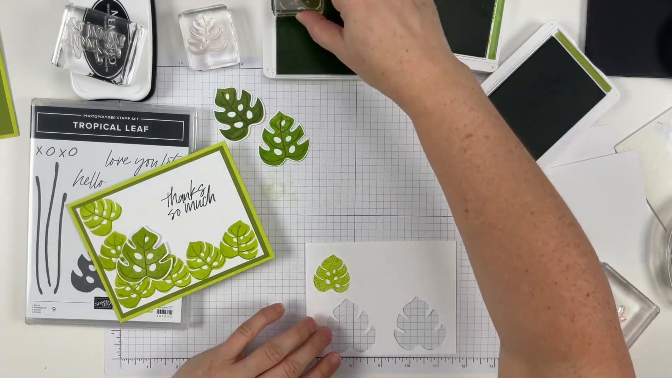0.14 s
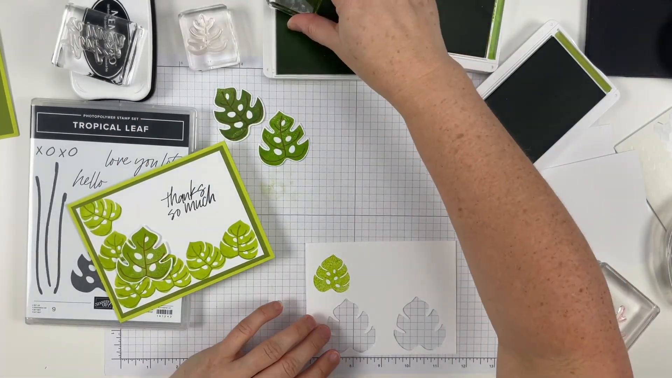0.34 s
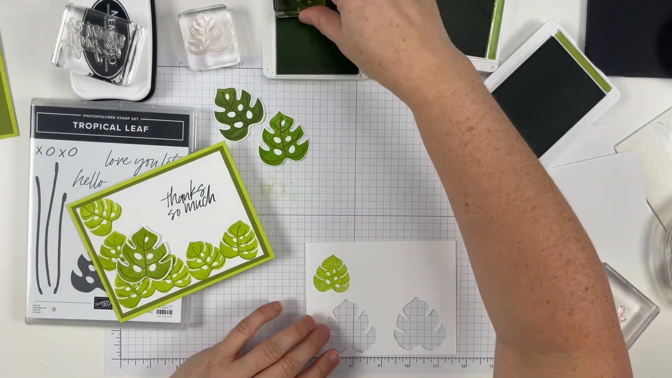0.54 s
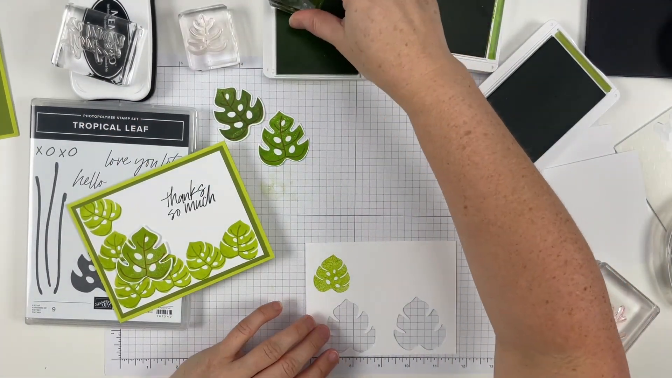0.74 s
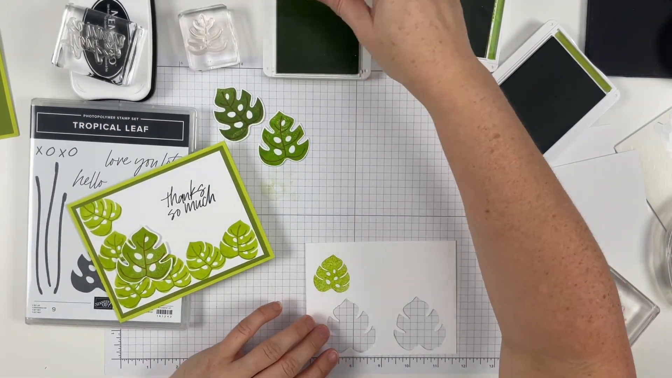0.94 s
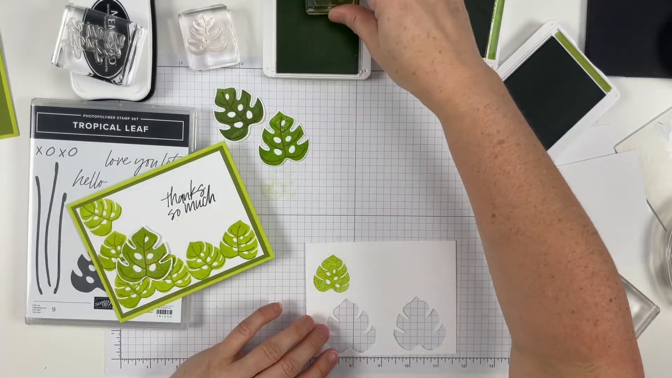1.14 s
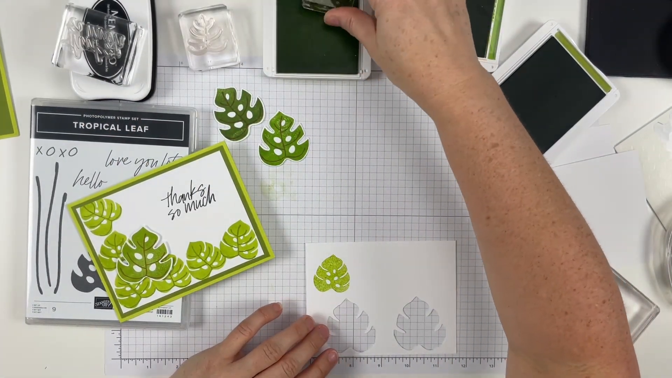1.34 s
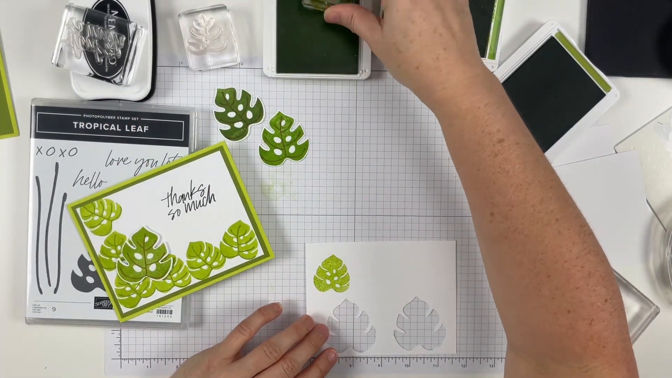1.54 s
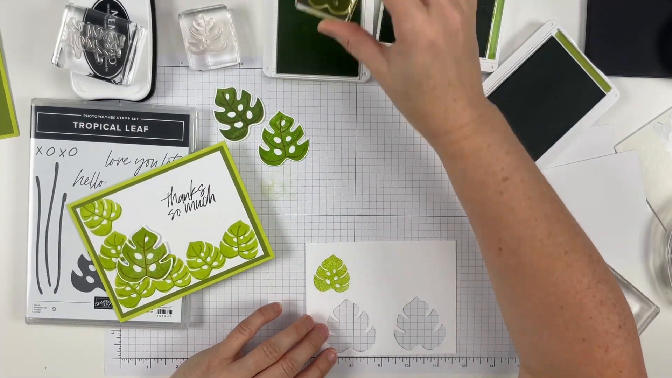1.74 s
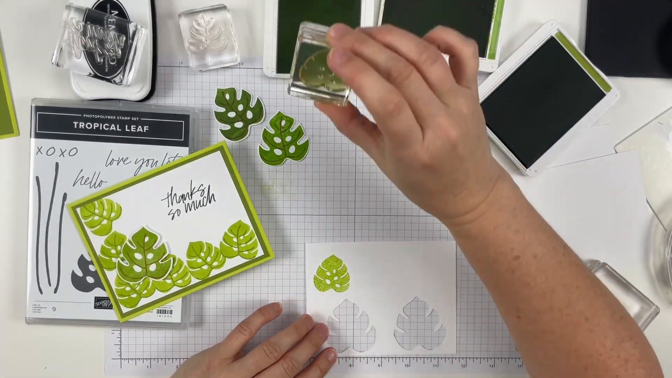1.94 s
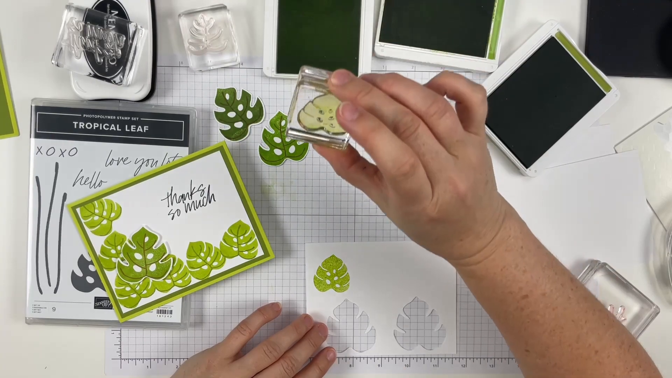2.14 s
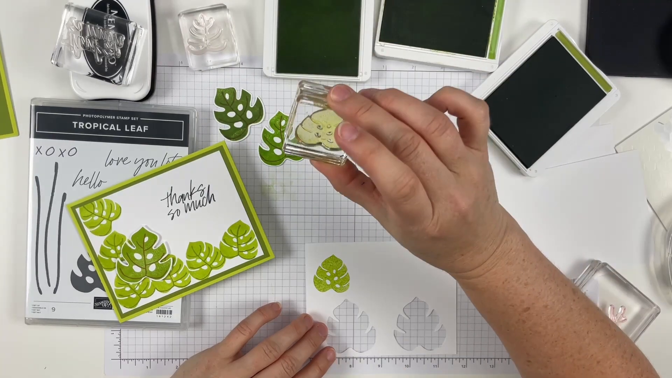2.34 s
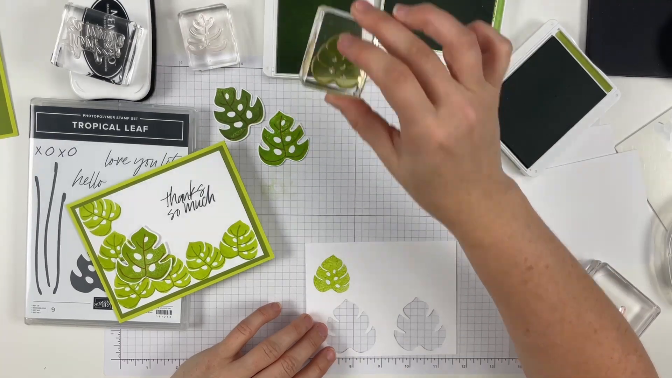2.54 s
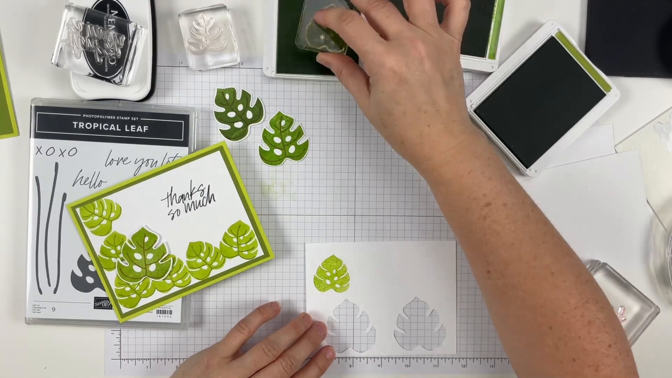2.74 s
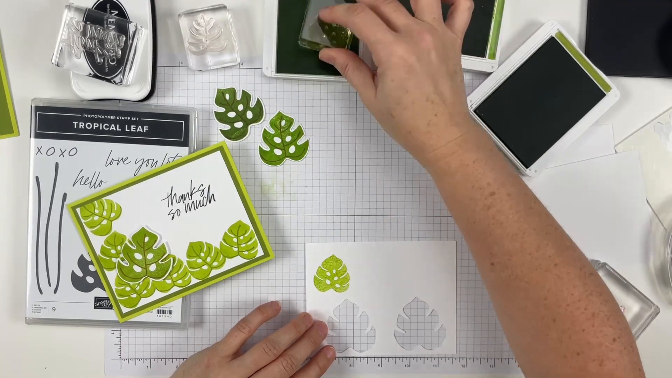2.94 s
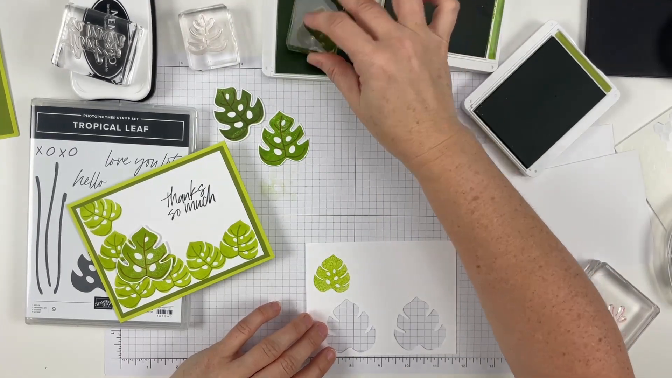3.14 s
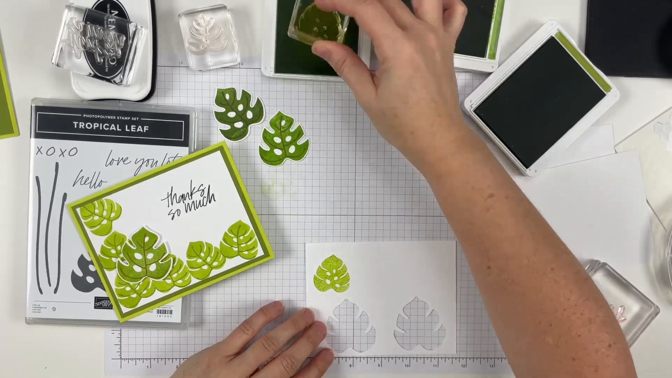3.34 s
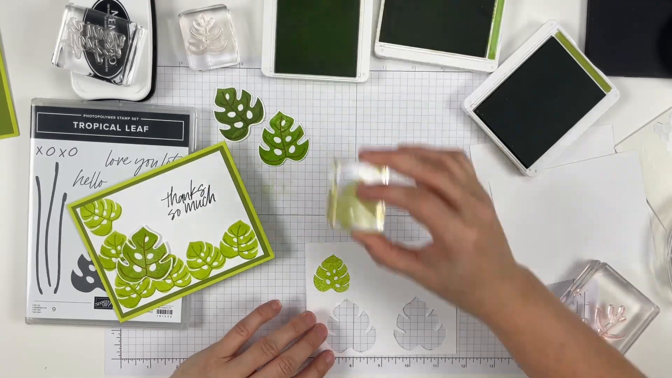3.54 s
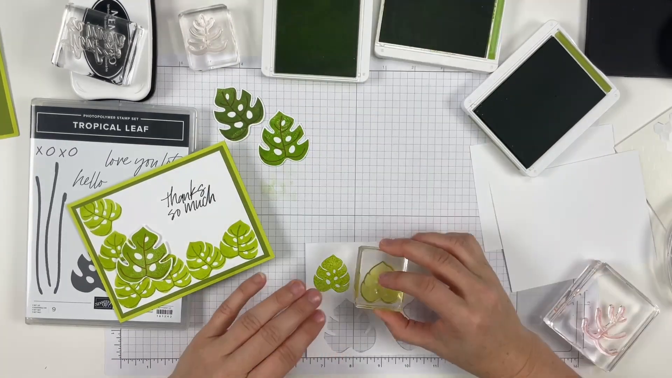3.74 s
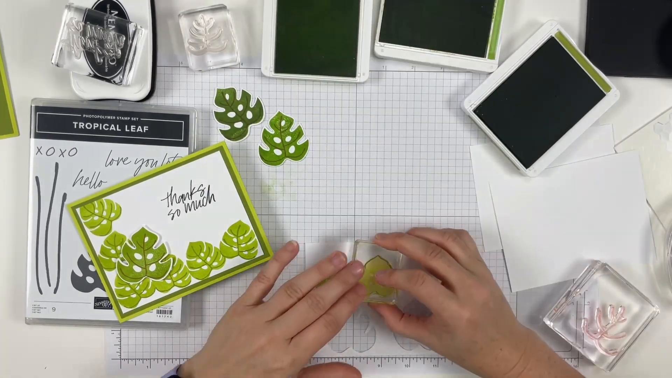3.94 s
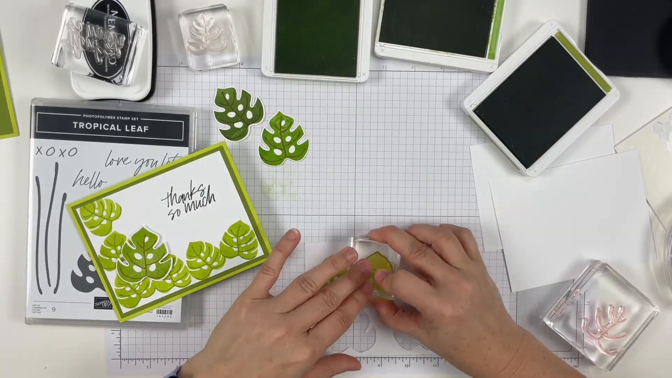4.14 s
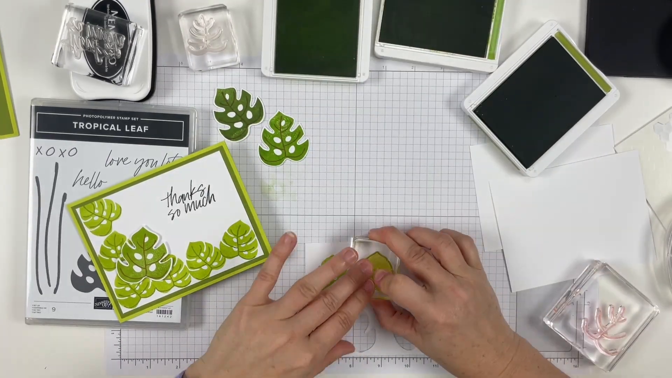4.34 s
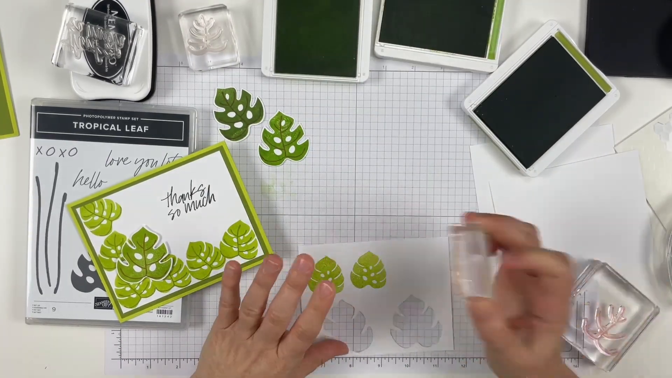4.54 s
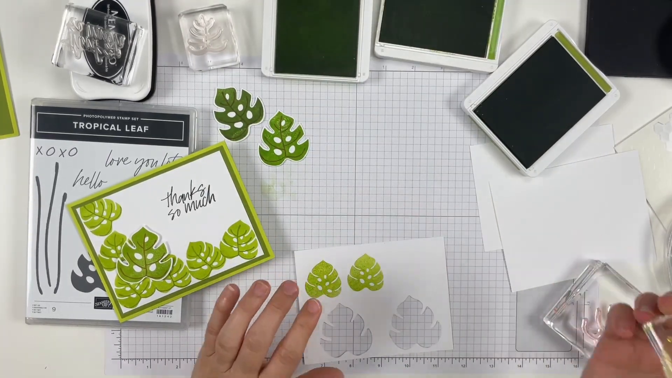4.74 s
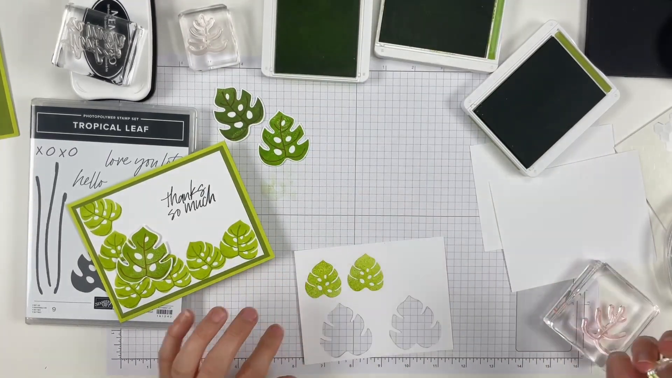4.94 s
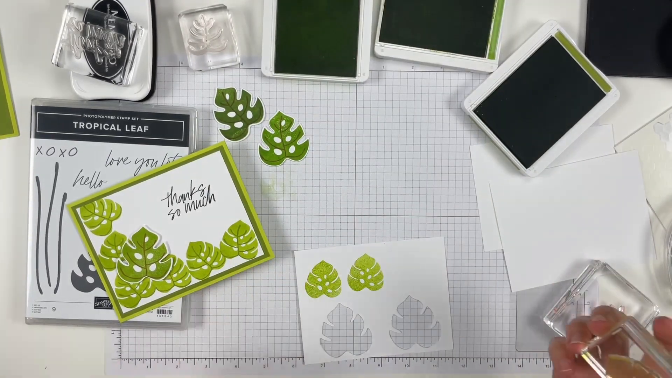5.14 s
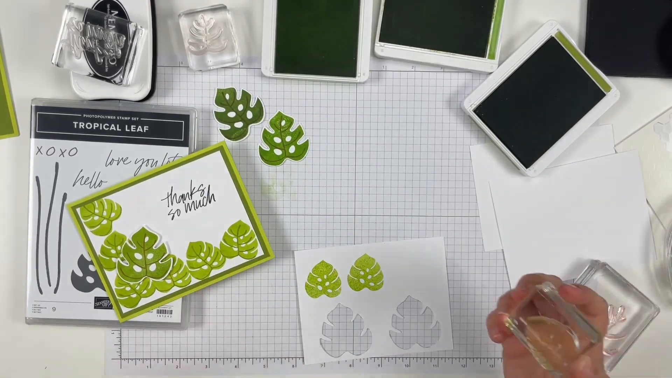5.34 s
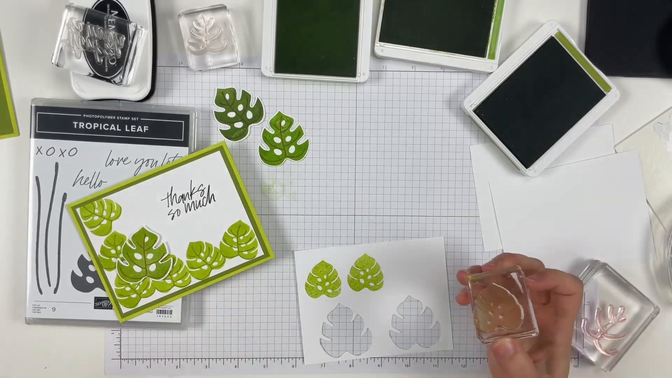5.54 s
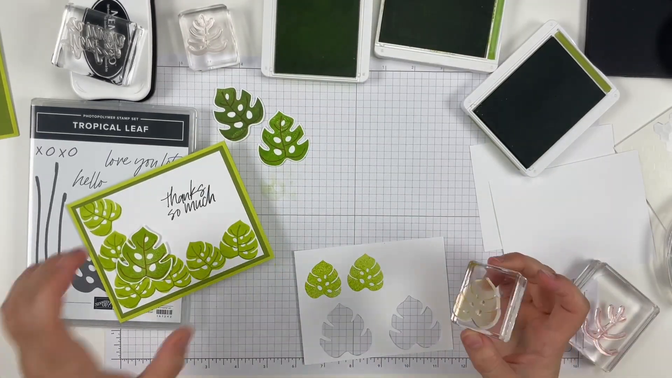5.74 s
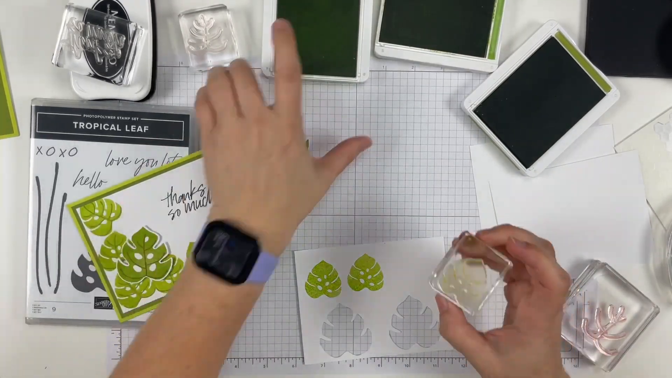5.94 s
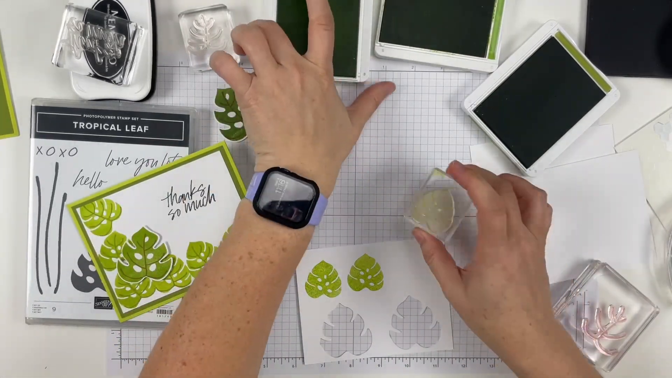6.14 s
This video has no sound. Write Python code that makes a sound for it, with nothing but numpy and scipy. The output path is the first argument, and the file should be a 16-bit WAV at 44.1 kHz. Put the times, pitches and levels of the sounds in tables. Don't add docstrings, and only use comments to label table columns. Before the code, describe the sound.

A small furnished room hums low with a faint fan and light hiss, heard by a phone close above a craft table. A soft foam press thumps at 0.2 s, a light click follows at 0.5, then a sharp plastic tap on the ink pad at 0.85 with a quick bounce. Faint touches, thin squeaks and small scuffs fill 1 to 2.3 s. Gritty handling ticks gather at 2.6 to 2.8, leading to cushioned pad thumps at 2.8, 3.0 and a firm one at 3.2, with faint squeaking. At 4.04 the block strikes card and table with the loudest, heavy woody knock, then rocks dully until 4.25. Sticky rubber drags and snaps faintly around 4.45; a light set-down knock follows at 4.6. Fumbling at 5.3 ends in a bright, hard plastic clack at 5.4, then only soft rustling and room hum until the end.

```python
import sys
import numpy as np
from scipy import signal
from scipy.fft import rfft, irfft
from scipy.io import wavfile
from scipy.ndimage import uniform_filter1d

SR = 44100
rng = np.random.default_rng(int(sys.argv[2]) if len(sys.argv) > 2 else 0)


def dump_mix(stems):
    frames = np.atleast_2d(stems).T
    limited = np.clip(frames, -1, 1)
    pcm = np.round(limited * 32767).astype(np.int16)
    wavfile.write(sys.argv[1], SR, pcm)


def convert_level_to_amplitude(level_db):
    exponent = np.asarray(level_db, float) / 20
    return 10 ** exponent


N = 273640
TOP_HZ = 15700


def level(x, db):
    return x * convert_level_to_amplitude(db) / np.sqrt(np.mean(x ** 2))


def band(x, hz, width):
    b, a = signal.iirpeak(hz, hz / width, fs=SR)
    return signal.lfilter(b, a, x)


def bandpass(x, edges, order=2):
    return signal.sosfilt(signal.butter(order, edges, "band", fs=SR, output="sos"), x)


def lowpass(x, hz):
    return signal.sosfilt(signal.butter(2, hz, fs=SR, output="sos"), x)


def decaying_tone(t, hz, db, t60):
    return convert_level_to_amplitude(db - 60 * t / t60) * np.sin(2 * np.pi * hz * t)


def ring(modes):
    t = np.arange(SR // 3) / SR
    response = sum((-1) ** k * decaying_tone(t, *mode) for k, mode in enumerate(modes))
    return response / np.abs(response).max()


def strike(force, response):
    return signal.fftconvolve(force, response)[:N]


def walk(rate):
    hold = int(SR / rate)
    steps = np.repeat(rng.standard_normal(N // hold + 1), hold)
    return level(uniform_filter1d(steps, hold)[:N], 0)


def contacts(rows, crack_db):
    return [(s, table, case, block, block + crack_db, last) for s, table, case, block, last in rows]


def alike(rows, colour_db, last):
    return [(s, *np.add(db, colour_db), last) for s, db in rows]


# low edge in Hz, high edge in Hz.
BODY_RANGES = [(130, 890), (700, 1730), (1900, 4570), (5000, TOP_HZ)]


def radiate(rows, order=2):
    return sum(bandpass(x[:N], edges, order) for x, edges in zip(rows, BODY_RANGES))


# start in seconds, table, pad case and block levels in dB, loudest note in Hz.
BARE_KNOCKS = [
    (0.523, -47, -36, -42.5, 1400),
    (1.261, -56.5, -53.5, -59, 307),
    (4.04, -3, -8.5, -28, 279.5),
    (4.621, -29, -32, -43, 769),
    (5.169, -59.5, -55.5, -63.5, 740),
    (5.261, -35.5, -33.5, -42.5, 405),
    (5.37, -32, -40.5, -59, 580),
    (5.383, -67, -21, -39, 552),
    (5.4, -26, -12, -11.5, 1935),
]
PAD_TAPS = [
    (0.837, -23, -26, -33, 330),
    (0.8485, -8, -12, -11, 302),
    (0.8655, -30.5, -21.5, -26.5, 358),
    (1.6, -39, -49.5, -50, 400),
    (1.615, -49.5, -48.5, -52, 440),
    (2.984, -21.5, -21, -27, 387),
    (3.176, -30, -42.5, -48, 288),
    (3.206, -46.5, -58, -60, 250),
    (3.323, -51, -56, -70, 300),
    (3.572, -42, -55, -55, 250),
]
# start in seconds, level in dB.
ROCKS = [
    (4.144, -34.5),
    (4.173, -30),
    (4.203, -30),
    (4.224, -28.5),
    (4.245, -54),
    (4.569, -56),
]
# start in seconds, level in dB.
PEEL_SNAPS = [
    (4.040, -45),
    (4.451, -49.5),
    (4.470, -49.5),
    (3.8, -66.5),
    (4.780, -68.5),
]
# frequency in Hz, level in dB, t60 in seconds.
TABLE_MODES = [(126, 1, 0.12), (283, -9.5, 0.012), (357.6, 0, 0.17), (419, 2, 0.11), (513.6, 1, 0.12),
               (590, 4.5, 0.076)]
PAD_CASE_MODES = [(796, 5, 0.0098), (976, 2.5, 0.014), (1090, 8.5, 0.013), (1400, 4.5, 0.027),
                  (1890, -26, 0.0067), (2252, -11, 0.0092), (699.8, -9, 0.041)]
BLOCK_MODES = [(2514, 11, 0.0087), (2992, 10, 0.0061), (3780, -5, 0.0028), (3850, -1, 0.028),
               (4680, -10, 0.0017), (5850, -19, 0.002)]
CRACK_MODES = [(7270, 10.5, 0.0029), (8400, -5.5, 0.001), (11900, -5.5, 0.00067)]
ARM_MODES = [(35.54, -18.5, 0.36), (89.8, -10, 0.079)]
# start in seconds, frequency in Hz, level in dB, t60 in seconds.
SPOT_MODES = [(0.522, 1397, -41.5, 0.039), (0.523, 3910, -38, .015), (0.848, 2820, -4.5, 0.0099),
              (0.848, 1366, -15.5, 0.039), (0.851, 3900, -22, .01), (0.865, 348.5, -15, .03),
              (1.6, 432, -39, .12), (2.984, 670, -23, 0.031), (2.984, 1840, -30, 0.043),
              (2.983, 1240, -55, .02), (4.038, 1124, -14, 0.036), (4.039, 820, -13.5, 0.022),
              (4.621, 824, -33, 0.083), (4.622, 1820, -48, 0.037), (5.261, 593, -34.5, 0.036),
              (5.399, 950, -19, 0.04), (5.399, 603, -25, 0.04), (5.401, 2890, -7.5, .015)]
# end in seconds, then table, pad case, block and crack levels in dB.
PLACES = [
    (1.0, -2.5, -1.5, -5.5, -4),
    (3.7, -5, 0, -1.5, -4.5),
    (5.0, -2, -1, -5, -9),
    (7.0, 8, 8, 6.5, 8),
]
BODY_DB = (-4.5, -0.5, 2, 0.5)
SNAP_DB = (35, 30, 22, 10)
SPREAD_DB = (32.4, 31, 28.32, 21.5)


def knocks():
    LEAD_S = 0.0011
    RATTLE_S, RATTLE_SHARE = 0.002, 0.04
    NOTE_DB, NOTE_CYCLES = -1.5, 9
    blows = contacts(PAD_TAPS, -8) + contacts(BARE_KNOCKS, -5)
    blows += alike(ROCKS, (-4.5, -4.5, -24, -43), 257)
    blows += alike(PEEL_SNAPS, (-20, -25, 5, 11.5), 300)
    t = np.arange(SR // 10) / SR
    force, click, wet = np.zeros((4, N + len(t))), np.zeros((4, N)), np.ones((4, N))
    notes, modes = np.zeros(N + len(t)), np.zeros(N + len(t))
    for s, *db, note_hz in blows:
        start = int((s - LEAD_S) * SR)
        at = slice(start, start + len(t))
        strength = convert_level_to_amplitude(np.add(db, BODY_DB))
        blow = rng.standard_normal((4, len(t))) * np.exp(-t / RATTLE_S) * RATTLE_SHARE
        blow[:, 0] = 1
        force[:, at] += strength[:, None] * blow
        click[:, start] += strength
        place_db = next(place[1:] for place in PLACES if s < place[0])
        wet[:, start] = convert_level_to_amplitude(np.array(place_db))
        note_db = NOTE_DB + (db[0] if note_hz < 700 else db[1] + BODY_DB[1])
        notes[at] += decaying_tone(t, note_hz, note_db, NOTE_CYCLES / note_hz)
    for s, *mode in SPOT_MODES:
        modes[int(s * SR):int(s * SR) + len(t)] += decaying_tone(t, *mode)
    modes = modes[:N]
    notes = bandpass(notes[:N], (200, 3000))
    bodies = (TABLE_MODES, PAD_CASE_MODES, BLOCK_MODES, CRACK_MODES)
    rings = radiate([strike(f, ring(body)) for f, body in zip(force, bodies)])
    snap = radiate(click * convert_level_to_amplitude(np.array(SNAP_DB))[:, None], order=3)
    shake = convert_level_to_amplitude(-20) * uniform_filter1d(strike(click[0], ring(ARM_MODES)), size=150)
    spread_gain = convert_level_to_amplitude(np.array(SPREAD_DB)) * (1, -1, 1, -1)
    spread = radiate(wet * click * spread_gain[:, None], order=3)
    near = snap + shake + rings + notes + modes
    return near, spread + 2.8 * notes + convert_level_to_amplitude(-14) * modes


# start in seconds, level in dB, sway of the arm in dB.
THUDS = [
    (0.196, -26, -36.5),
    (0.475, -59, -55),
    (0.865, -16, -45),
    (1.158, -34, -35.5),
    (1.935, -75, -65),
    (2.793, -22.5, -31.5),
    (2.983, -20.5, -49),
    (3.174, -15, -32),
    (3.322, -40.5, -60),
    (3.737, -52, -49),
]
# frequency in Hz, level in dB, t60 in seconds.
FOAM_MODES = [(328.3, 15.5, 0.021), (124.35, -2, 0.12), (468, -2, 0.025), (216, -27, 0.02)]


def thuds():
    PUSH_S, REBOUND_S, SWAY_LAG_S = 0.0027, 0.036, 0.0088
    REBOUND_DB = -12.5
    press, sway = np.zeros(N), np.zeros(N)
    for s, db, sway_db in THUDS:
        press[int(s * SR)] += convert_level_to_amplitude(db + 6)
        press[int((s + REBOUND_S) * SR)] -= convert_level_to_amplitude(db + 4.0 + REBOUND_DB)
        sway[int((s + SWAY_LAG_S) * SR)] += convert_level_to_amplitude(sway_db + 4)
    push = np.hanning(int(PUSH_S * SR))
    return strike(strike(press, ring(FOAM_MODES)) + strike(sway, ring(ARM_MODES)), push / push.sum())


# start in seconds, table, pad case and block levels in dB, length in seconds.
SCUFFS = [(1.395, -48.5, -50, -54.5, 0.023), (1.585, -45.5, -73, -54, 0.019),
          (1.6, -47, -38, -64.5, 0.0085), (1.782, -65, -52, -55, 0.016), (2.138, -42.5, -40, -45, 0.021),
          (2.216, -43.5, -40.5, -52.5, 0.027), (2.583, -45.5, -46, -55.5, 0.048),
          (2.663, -32.5, -44, -36, 0.014), (2.684, -35, -30.5, -40, 0.01), (2.731, -33, -29, -34, 0.0065),
          (2.743, -40.5, -36.5, -56, 0.0088), (2.764, -38, -30, -31.5, 0.0067),
          (2.784, -41, -42, -45, 0.017), (5.274, -43.5, -38, -46.5, 0.0096),
          (5.793, -52.5, -72.5, -57, 0.0087), (5.88, -50, -64, -54.5, 0.015)]
# start in seconds, level in dB.
PEEL_DRAGS = [
    (4.443, -47.5),
    (4.458, -42.5),
]
# frequency in Hz, width in Hz, level in dB.
SCUFF_RESONANCES = [(3600, 620, 2.5), (1800, 110, 2.5), (980, 120, -6.5), (453, 39, -2), (2530, 670, -9)]


def scuffs():
    RISE_S = 0.002
    SCUFF_DB = (7.6, 2.67, 3.7, 9.3)
    rubs = contacts(SCUFFS, -21)
    rubs += alike(PEEL_DRAGS, (-0.5, 2, 2, -10.5), 0.015)
    t = np.arange(SR // 5) / SR
    force = np.zeros((4, N + len(t)))
    for s, *db, length in rubs:
        shower = rng.standard_normal(len(t)) * convert_level_to_amplitude(2.0 * rng.exponential(size=len(t)))
        shower *= (1 - np.exp(-t / RISE_S)) * np.exp(-t / np.clip(length, 0.001, 0.04))
        at = int((s - RISE_S) * SR)
        force[:, at:at + len(t)] += convert_level_to_amplitude(np.add(db, SCUFF_DB))[:, None] * shower
    rub = radiate(force)
    return rub + sum(convert_level_to_amplitude(db) * band(rub, hz, width) for hz, width, db in SCUFF_RESONANCES)


# loudest
# moment in seconds, level in dB, rise in seconds, fall in seconds, bright share in dB.
RUSTLES = [(0.0, -68, .1, 0.42, -17), (0.822, -67.5, .045, 0.015, -16), (2.241, -67.5, 0.077, 0.062, -17.5),
           (2.74, -52.5, 0.11, 0.11, -43.5), (3.52, -71.5, 0.18, 0.18, -17.5),
           (3.73, -62.5, 0.055, 0.1, -8.5), (4.102, -72, 0.017, 0.4, -16), (4.429, -69, 0.46, 0.14, -17.5),
           (4.64, -60.5, 0.064, 0.056, -13.5), (4.801, -65, 0.11, 0.25, -23.5),
           (5.649, -70, 0.26, 0.06, -8), (5.886, -63, .15, .12, -15.5), (6.15, -59, 0.14, 0.36, -12.5)]
# frequency in Hz, width in Hz, level in dB.
CLOTH = [(1635, 1000, 17.5), (3330, 1100, 19.5), (8500, 1900, -13.5), (11100, 5800, 10.5)]


def rustles():
    SWELL_DB = 12.5
    t = np.arange(N) / SR
    grains = rng.standard_normal(N) * convert_level_to_amplitude(0.58 * rng.exponential(size=N) + 2.5 * walk(60))

    def coloured(resonances):
        return level(sum(convert_level_to_amplitude(db) * band(grains, hz, width) for hz, width, db in resonances), 0)

    dull, bright = coloured(CLOTH[:2]), coloured(CLOTH[2:])
    out = np.zeros(N)
    for s, db, rise, fall, bright_db in RUSTLES:
        away = np.where(t < s, (s - t) / max(rise, 0.03), (t - s) / max(fall, 0.01))
        out += convert_level_to_amplitude(db + 2.5 - SWELL_DB * away) * (dull + convert_level_to_amplitude(bright_db + 2.0) * bright)
    return out


# start in seconds, length in seconds, pitch in Hz, level in dB.
SQUEAKS = [
    (0.0, 0.36, 6700, -87),
    (.47, 0.12, 3430, -69),
    (.47, 0.044, 2900, -84),
    (.67, 0.047, 2360, -80),
    (1.03, .3, 7480, -85),
    (1.49, .08, 3170, -77),
    (3.56, .1, 2840, -73),
    (3.22, 0.15, 3144, -71.5),
    (3.23, 0.28, 3450, -71.5),
    (3.26, 0.11, 3850, -74),
]


def squeaks():
    WIDTH_HZ = 70
    out = np.zeros(N)
    for s, length, hz, db in SQUEAKS:
        n, at = int(length * SR), int(s * SR)
        air = rng.standard_normal(SR // 2)
        whistle = band(band(air, hz, WIDTH_HZ), hz, WIDTH_HZ)
        out[at:at + n] += level(whistle, db - 0.5)[-n:] * np.hanning(n) ** 0.4
    return out


# band centre in Hz, t60 in seconds, level in dB.
ROOM_BANDS = [(123, 0.4, -14), (250, 0.21, -11.5), (529, 0.19, 0.5), (1046, 0.26, -7.5), (2020, 0.21, -5.5),
              (3850, 0.24, -6), (7300, 0.24, -13.5), (13200, 0.067, -15)]


def room(x):
    GAP_S = 0.0015
    LATE_DB, LATE_STRETCH = -17.5, 2.33
    t = np.arange(SR // 2) / SR
    tail = np.zeros(len(t))
    for hz, t60, db in ROOM_BANDS:
        width = 0.71 * hz
        echo = band(band(rng.standard_normal(len(t)), hz, width), hz, width)
        decay = convert_level_to_amplitude(-60 * t / t60) + convert_level_to_amplitude(LATE_DB - 60 * t / t60 / LATE_STRETCH)
        tail += level(echo, db - 45.5) * np.sqrt(hz / 1000) * decay
    return strike(x, tail * np.clip(t / GAP_S, 0, 1) ** 2)


# frequency in Hz, level in dB per Hz.
HUM_SPECTRUM = [(13, -43.5), (22, 1.5), (131, -4.5), (160, -16.5), (800, -22.5), (1000, -30), (3730, -35.5),
                (14000, -38.5)]
# frequency in Hz, width in Hz, level in dB.
FAN = [(122.8, 27, -63), (304, 21, -71), (870, 20, -82.5)]


def hum():
    hz, db = np.transpose(HUM_SPECTRUM)
    f = np.fft.rfftfreq(N, 1 / SR)
    shape = convert_level_to_amplitude(np.interp(np.log(f + 1), np.log(hz), db, left=-60))
    bass = 1 / (1 + (f / 400) ** 2)
    low = irfft(rfft(rng.standard_normal(N)) * shape * np.sqrt(bass), N)
    high = irfft(rfft(rng.standard_normal(N)) * shape * np.sqrt(1 - bass), N)
    air = level(low * convert_level_to_amplitude(2.0 * walk(19)) + high * convert_level_to_amplitude(0.52 * walk(7.2)), -56.5)
    fan = sum(level(band(rng.standard_normal(N), f0, width), fan_db) for f0, width, fan_db in FAN)
    return air + fan


def scene():
    near, spread = knocks()
    rubbing = scuffs() + rustles()
    soft = thuds()
    hands = near + rubbing + soft + room(spread + 0.88 * rubbing + 0.9 * soft)
    hands = lowpass(hands, 10400)
    return (hands + hum() + squeaks())[None]


def roll_off(x):
    return signal.sosfilt(signal.butter(12, 15610, fs=SR, output="sos"), x)


def record(dry):
    top_cut = signal.ellip(8, 0.2, 40, TOP_HZ, fs=SR, output="sos")
    mix = np.clip(signal.sosfilt(top_cut, dry), -1, 1)
    return roll_off(mix)


dry = scene()
out = record(dry)
dump_mix(out)
```